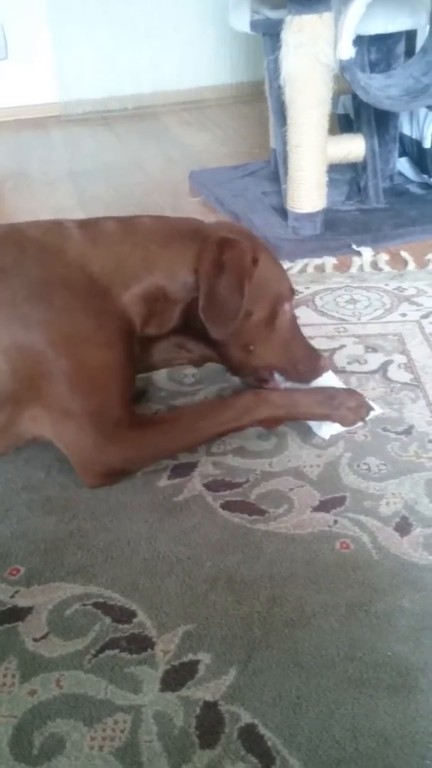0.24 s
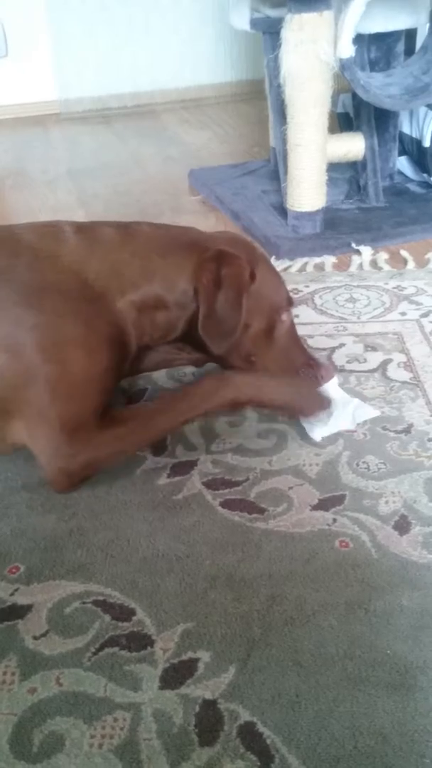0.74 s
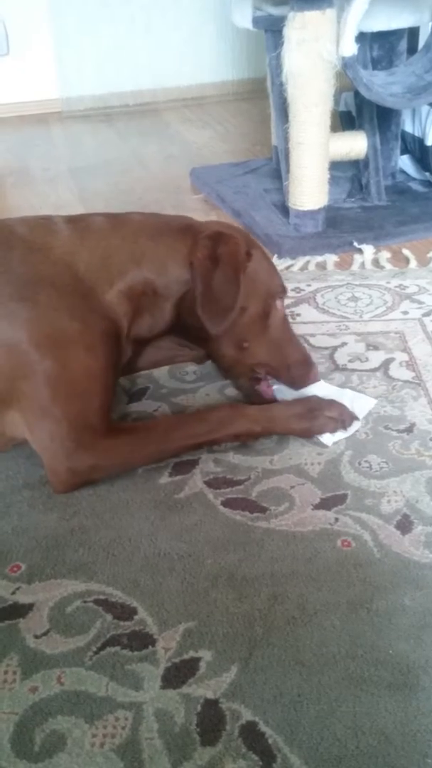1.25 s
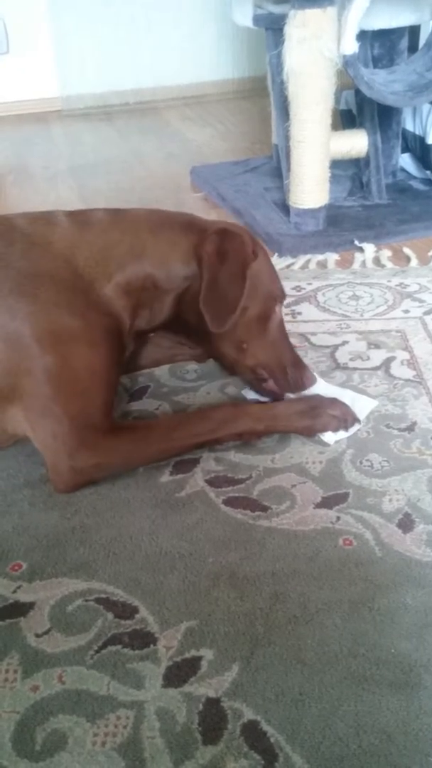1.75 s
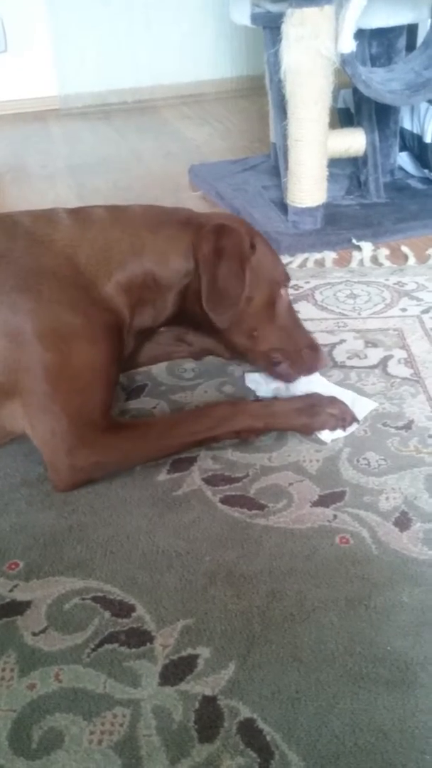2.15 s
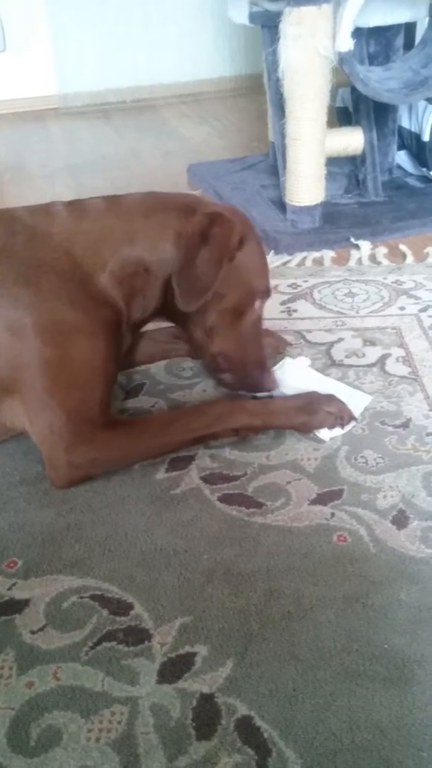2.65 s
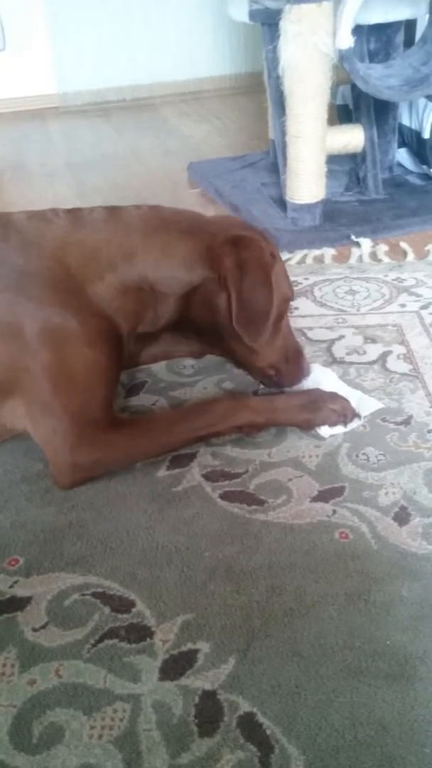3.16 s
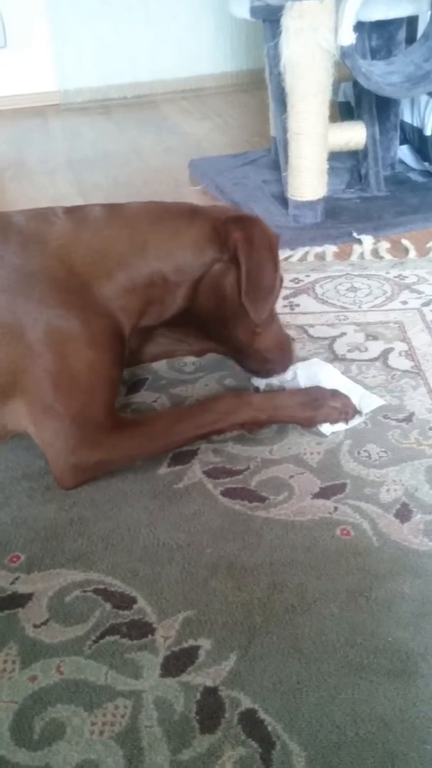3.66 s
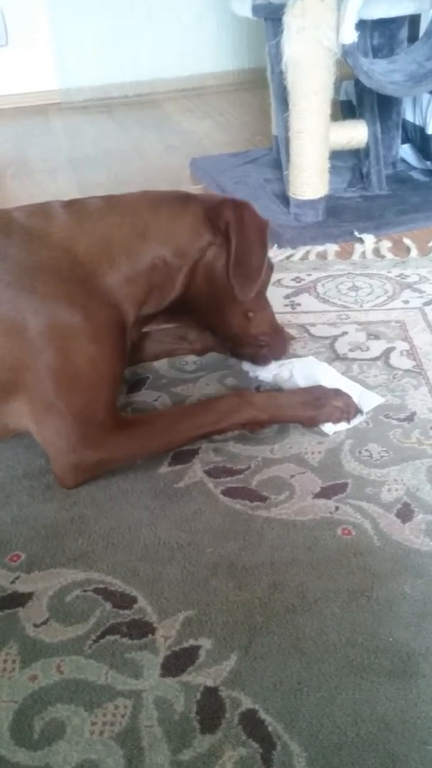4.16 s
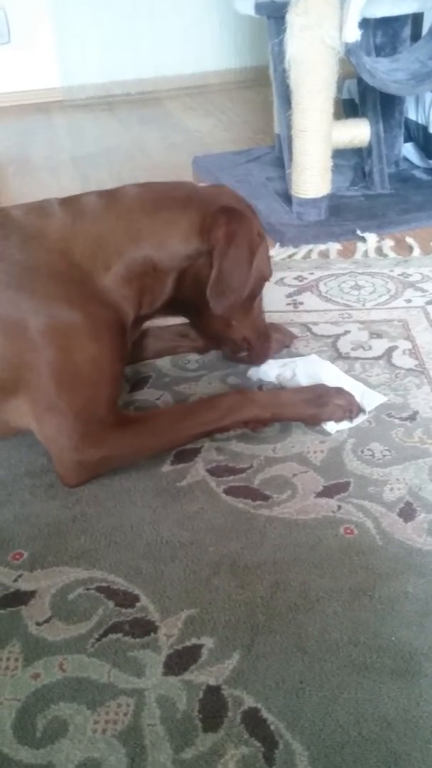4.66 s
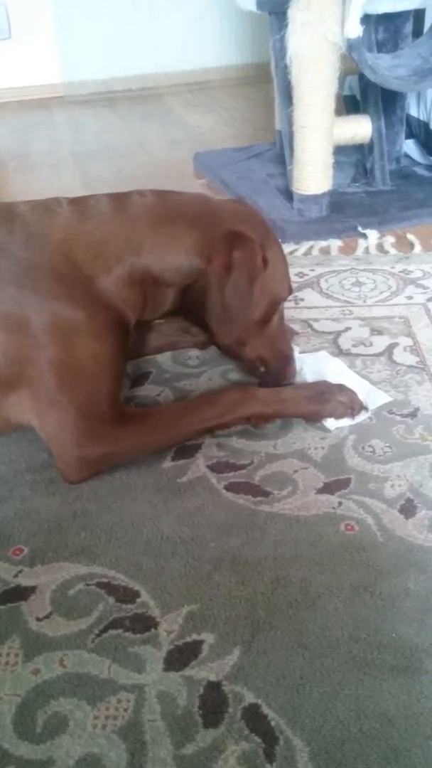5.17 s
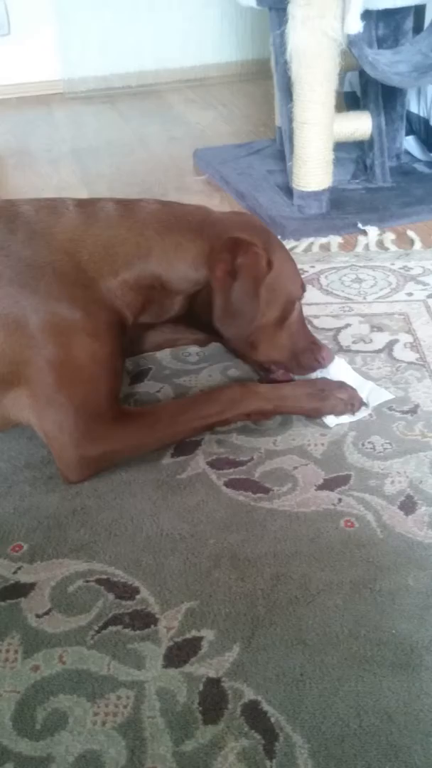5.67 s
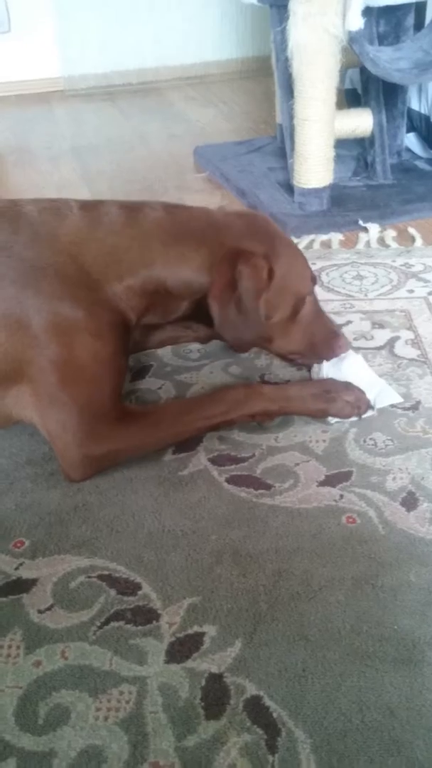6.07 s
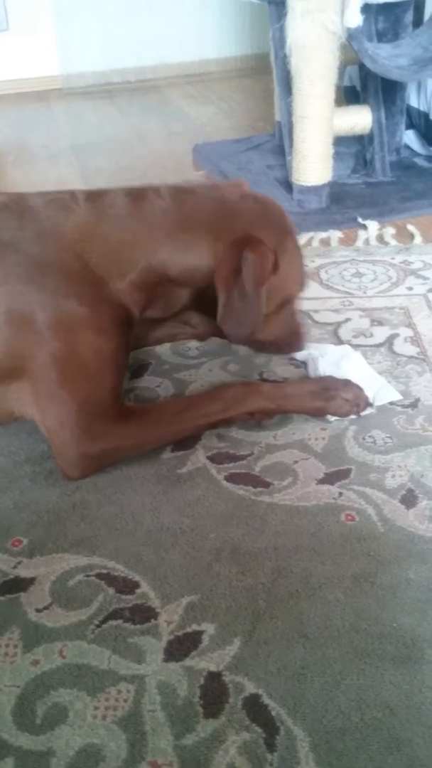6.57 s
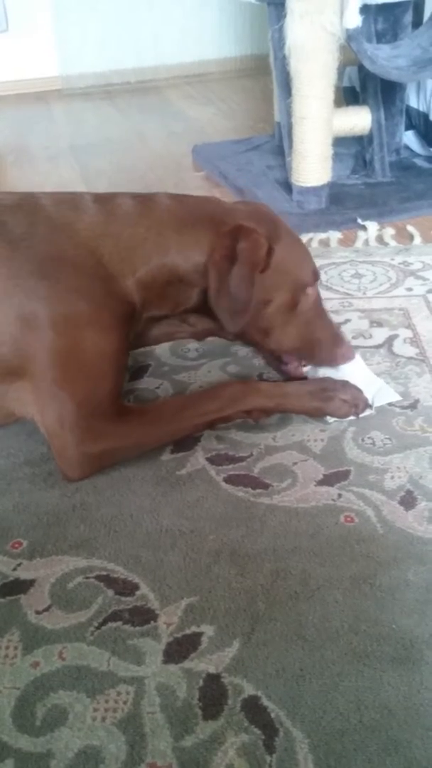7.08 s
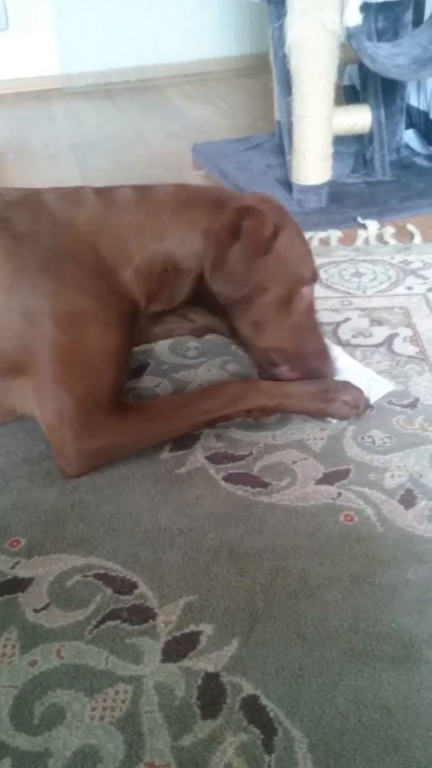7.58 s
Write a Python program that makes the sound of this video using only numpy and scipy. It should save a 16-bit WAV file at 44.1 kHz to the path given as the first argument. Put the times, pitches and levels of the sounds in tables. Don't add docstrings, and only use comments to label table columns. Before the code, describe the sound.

In a furnished room, a dog on a rug chews a paper packet roughly a metre from a small stereo microphone, over faint steady hiss and low room tone. A loud, sharp snap starts immediately, followed by dry rustles and single crackling creases, with another strong snap near 0.6 s. Irregular pawing and tearing continues to about 1.9 s. Crisp snaps at 2.0 s lead to the fullest ripping rustle around 2.6 s, then brittle crackles near 3.1 s. From 3.5 to 4.5 s small wet tongue ticks mix with lighter crinkles. Around 4.5 to 5.3 s it is sparse and quiet. A clear crease at 5.4 s restarts nibbling, with dull tooth and paw knocks. From 6 to 7.5 s a very faint, rough low groan lies underneath, with hollow gulps near 6.4, 7.0 and 7.2 s. Denser sharp crackles at 7.2-7.5 s lead to final crinkles before 7.8 s.

```python
import sys
import numpy as np
from scipy import signal
from scipy.fft import rfft, irfft, next_fast_len
from scipy.io import wavfile
from scipy.ndimage import uniform_filter1d

SR = 44100
rng = np.random.default_rng(int(sys.argv[2]) if len(sys.argv) > 2 else 0)


def master_out(mix):
    frames = np.transpose(np.atleast_2d(mix))
    ceiling = np.clip(frames, -1, 1)
    pcm = np.round(ceiling * 32767).astype(np.int16)
    wavfile.write(sys.argv[1], SR, pcm)


def invert_db(level):
    return 10 ** (np.asarray(level, dtype=float) / 20)


N = 345744
SIZE = next_fast_len(N + SR // 2)
HZ = np.arange(SIZE // 2 + 1) * SR / SIZE
PAPER_HZ = 500 * 2 ** np.arange(0, 5.1, .5)


def on_log(table, hz):
    f, v = np.transpose(table)
    return np.interp(np.log(hz + 1), np.log(f + 1), v)


def on_time(table):
    s, *columns = np.transpose(table)
    return np.array([np.interp(np.arange(N) / SR, s, c) for c in columns])


def causal(gain_db):
    c = irfft(gain_db * np.log(10) / 20, SIZE)
    c[1:SIZE // 2] *= 2
    c[SIZE // 2 + 1:] = 0
    return np.exp(rfft(c))


def bands(rows):
    pick = np.eye(len(PAPER_HZ))
    total = 0
    for k, row in enumerate(rows):
        gain = on_log(np.c_[PAPER_HZ, pick[k]], HZ) ** .5
        total = total + gain * rfft(row, SIZE)
    return total


def spread(low_db, mid_db, high_db):
    place = np.interp(np.log(PAPER_HZ), np.log([1900, 3200, 5600, 8500]), [0, 1, 1, 2])[:, None]
    low_part = np.clip(1 - place, 0, 1) * (low_db + 12.0 - mid_db)
    high_part = np.clip(place - 1, 0, 1) * (high_db + 3.5 - mid_db)
    return mid_db + low_part + high_part


def puff(clicks, decay_s):
    fall = np.exp(-1 / (decay_s * SR))
    return signal.lfilter([1], [1, -fall], clicks) * rng.standard_normal(clicks.shape)


def pair(left, own, near=0):
    alike = on_log([(50, 0.37), (130, 0.68), (700, 0.3), (2500, 0.048), (5000, 0.23)], HZ)
    alike = np.clip(alike, 0, .99)
    share = alike + np.clip(near, 0, 1) * (1 - alike)
    return np.array([left, share * left + (1 - share ** 2) ** .5 * own])


# f/Hz, level/dB
HISS_LEFT = [(40, -49.5), (130, -52.5), (250, -57), (400, -57), (750, -62.5), (1100, -67), (2000, -58),
             (3500, -59), (5100, -55), (7000, -60), (11000, -65), (15400, -100)]
HISS_RIGHT = [(40, -55), (130, -50), (250, -54), (400, -60), (750, -61), (1100, -64), (2000, -55),
              (3500, -52.5), (5100, -60), (7000, -58.5), (11000, -64), (15400, -80)]


def room_tone():
    tone = pair(*(rfft(rng.standard_normal(N), SIZE) for _ in range(2)))
    colour = invert_db([on_log(HISS_LEFT, HZ), on_log(HISS_RIGHT, HZ)]) * np.array([[1], [-1]])
    return tone * colour * invert_db(-1.0) * np.minimum(HZ / 50, 1) ** 3


# peak t/s, level/dB, build-up/(dB/s), brightness/dB
PULLS = [(0.22, -41, 78, 2), (0.559, -32, 106, 6.5), (1.104, -43.5, 43, 3), (1.246, -46, 81, 7),
         (1.469, -60, 65, 16), (1.872, -46, 60, 6), (2.396, -43, 111, -4), (2.46, -47.5, 60, 2),
         (2.57, -39, 218, 12), (2.612, -29, 217, 7.5), (2.69, -43, 100, 2), (3.12, -37, 199, -2.5),
         (3.594, -53, 89, 11.5), (3.72, -60.5, 62, 4.5), (4.03, -54, 84, -10.5), (4.102, -46.5, 117, 14.5),
         (4.21, -45, 62, -8), (4.457, -66.5, 41, 12), (4.73, -57, 320, 5), (5.538, -45, 245, 3),
         (5.778, -58.5, 50, -4), (5.895, -46, 156, 1.5), (6.072, -43, 109, 3.5), (6.25, -59, 40, 3),
         (6.76, -61, -1, 3), (7.33, -45, 115, 5), (7.42, -41.5, 79, 4)]
# peak t/s, level/dB, brightness/dB
QUICK_BITES = [(0.0, -24, 8.5), (0.412, -51, -7), (0.756, -42, 4.5), (0.877, -39, 5), (1.565, -61, 17.5),
               (1.604, -62, 9), (1.628, -41, 2), (1.992, -44.5, -2), (2.052, -36, 10), (2.242, -43, 4),
               (2.927, -45.5, 1), (3.235, -50, 6), (3.374, -51.5, 0.5), (3.963, -43, -13), (4.775, -79, -2),
               (4.886, -53, 0), (4.956, -50, 2), (4.98, -45.5, 3.5), (5.015, -52, 4), (5.161, -44, 2.5),
               (5.337, -54, 3), (5.39, -68, 17), (6.336, -44, -3), (6.435, -49, 4), (6.6, -55, 11.5),
               (6.973, -49.5, 8), (7.009, -59, 16), (7.185, -53, 8), (7.222, -41.5, 1), (7.511, -55, 12),
               (7.662, -45.5, 0), (7.755, -40, 0.5)]
# t/s, low-band level re middle/dB
SHEET_SLACK = [(0, -16.5), (1.5, -9), (2.3, -10.5), (2.51, -11), (2.63, -14.5), (3.1, -12.5), (3.9, -14),
               (4.2, -18.5), (5.4, -22.5), (6.2, -14), (7.84, -12.5)]


def chewing_levels():
    pull_fall_db_s, bite_rise_db_s, bite_fall_db_s, hold_s = 146, 450, 210, 0.0012
    low_pace, high_pace = 0.69, 1.09
    high_db, rest_db = -6, (-82, -82, -73)
    t = np.arange(0, N + 64, 64) / SR
    rows = [(s, db, rise, pull_fall_db_s, hi) for s, db, rise, hi in PULLS]
    rows += [(s, db, bite_rise_db_s, bite_fall_db_s, hi) for s, db, hi in QUICK_BITES]
    s, db, rise, fall, bright = np.transpose(rows)[:, :, None]
    under = np.maximum(rise * (s - t), fall * np.maximum(t - s - hold_s, 0))
    low = db + np.interp(s, *np.transpose(SHEET_SLACK)) - low_pace * under
    high = db + high_db + bright - high_pace * under
    levels = zip((low, db - under, high), rest_db)
    power = [(invert_db(v) ** 2).sum(axis=0) + invert_db(rest) ** 2 for v, rest in levels]
    return on_time(np.c_[t, 10 * np.log10(power).T])


def rustle(per_s=1200, colour_db=3.5):
    count = int(per_s * N / SR)
    chance = rng.random((count, 2))
    colour = rng.standard_normal((count, len(PAPER_HZ)))
    size = invert_db(-3.2 * np.log(chance[:, 1]))[:, None] * invert_db(colour_db * colour)
    clicks = np.zeros((len(PAPER_HZ), N))
    clicks[:, (chance[:, 0] * N).astype(int)] = size.T
    buckles = puff(clicks, 0.00045)
    buckles /= np.sqrt(uniform_filter1d(buckles ** 2, 2000, axis=1) + 1e-9)
    levels = chewing_levels()
    uneven = np.interp(levels[1], [-44, -33], [1, .35])
    patchy = invert_db(-7 + 90 * uneven * uniform_filter1d(rng.standard_normal(N), 900))
    swell = uniform_filter1d(rng.standard_normal(clicks.shape), 1800, axis=1)
    patchy = patchy * invert_db(110 * uneven * swell)
    level = invert_db(spread(*levels))
    washes = [bands(patchy * level * rng.standard_normal(N)) for _ in range(2)]
    return invert_db(-7.0) * level * buckles, washes


# t/s, peak level/dB, dullness/dB, brightness/dB
CREASES = [(0.0103, -20, -3.5, 0.5), (0.185, -35, -0.5, -3.5), (0.21, -50, 10, -14),
           (0.268, -45, 4, 6), (0.3111, -35, -8, -7.5), (0.376, -47, 0, -2), (0.382, -40, -2, -15),
           (0.4089, -34, -4, -1), (0.429, -37.5, 5, -13), (0.4606, -50, -2, -4), (0.469, -54, -2, 19),
           (0.4765, -32.5, -4, 1), (0.5369, -44.5, 11, 22.5), (0.5631, -30.5, 0.5, -14),
           (0.5824, -21, -4.5, -8), (0.6978, -41.5, -4, -1), (0.7419, -33.5, -14, -18),
           (0.87, -36, 4, 0), (0.8744, -32, 3, -1), (0.883, -31, -4, 1), (0.8878, -47, 10, 4),
           (0.9597, -31, -4, -4.5), (1.0007, -39, 8, 4), (1.029, -45, 5, -3), (1.0713, -49, 5, 9),
           (1.092, -47, 7, 6), (1.115, -34.5, -2, -23), (1.162, -43, 8, -8), (1.1694, -41, 9, -12),
           (1.176, -49, 18.5, 11), (1.237, -41.5, 5, 1), (1.248, -41, 5, 0), (1.283, -42.5, 6, 6),
           (1.299, -55, 6, 11), (1.4558, -60.5, 17, 13), (1.5609, -48, 2, -7), (1.5997, -45, 12, 10),
           (1.6178, -46, 16, 9), (1.6263, -47, 9, -12), (1.64, -33.5, -6, -13), (1.6735, -55, -3, 11),
           (1.712, -43, -7, -10), (1.7316, -45, 1, 0), (1.7406, -44, 8, 10.5), (1.7627, -48, -10, 9),
           (1.7726, -44, -8, 6), (1.7888, -37, -6, -2), (1.793, -42, -5, 2), (1.822, -39.5, -1, 3),
           (1.864, -32.5, 2, -2.5),
           (1.908, -37.5, -5, 2), (1.914, -44, -15, 10), (1.9845, -35.5, -8, 10),
                (2.003, -39.5, -3, 12), (2.011, -32.5, -6, -8), (2.0318, -45, 12, 5), (2.0414, -35, -5, 14),
                (2.0457, -22.5, -2.5, -11), (2.0962, -45, 14, 11), (2.3098, -36, -6, -12),
                (2.314, -56, 8, 9), (2.3346, -38, -5, -0.5), (2.3596, -33.5, -7, -2),
                (2.3929, -43.5, 1, 17.5), (2.4025, -58, 3, 19), (2.4395, -33, -3, -15),
                (2.5283, -32.5, -16, -1.5), (2.548, -40, -7, 0), (2.599, -29, -1, -2),
                (2.886, -47.5, 7, -11), (2.917, -35.5, -17, -8), (3.018, -45, -5, -5), (3.04, -50, 12, 8),
                (3.048, -43, -12, 4), (3.0568, -33.5, -1, -7), (3.0856, -41, 10, 5), (3.092, -33.5, 0, 0),
                (3.1136, -27.5, 1, -1), (3.1983, -44, 5, 2), (3.2159, -30, -5.5, -0.5),
                (3.2257, -40.5, 5.5, -12), (3.3314, -41, 1.5, 4), (3.5478, -40.5, -19, -19),
                (3.8783, -48.5, 12.5, 0), (4.0269, -46, 3, -12), (4.0447, -36.5, 1, -16),
                (4.0543, -39, -1, 0), (4.0964, -38, 14, 2), (4.1302, -48.5, 6, 17), (4.133, -52, -4, 11),
                (4.1553, -41, -9, 9), (4.168, -36.5, -5, -3), (4.186, -43.5, 8, 8), (4.199, -40.5, 6, 15.5),
                (4.2135, -38, -1, 9.5), (4.6483, -55.5, 0, 4), (4.7273, -47, -9.5, -12),
                (4.9498, -41, -14, -12), (5.1561, -47.5, 16, 8), (5.3386, -59, 8, -5),
           (5.344, -49, -11, -15), (5.361, -28.5, -9, -9.5), (5.3712, -49, -13, -6),
                   (5.5094, -47, 2, -5), (5.5157, -37, 2, -21), (5.5322, -44, 3, 2), (5.541, -39, -8, -3),
                   (5.5475, -44, 1, -2), (5.567, -37.5, 2, 0.5), (5.776, -50, -7, 8),
                   (5.896, -43.5, -8, -3), (5.9678, -43, -2, -25), (5.9843, -59, 4, 11),
                   (6.023, -47.5, 11, -10), (6.096, -40, 3, -7), (6.1014, -51, 1, -11),
                   (6.162, -47, -11, -21), (6.1738, -49, -23, 1), (6.185, -44.5, 2.5, -11),
                   (6.3261, -39, 2, -5), (6.3359, -33.5, -1.5, -2.5), (6.4248, -40.5, -6, -9),
                   (6.4428, -39, -9, -16), (6.5905, -42.5, 8, -6), (6.8185, -46, -2.5, -6),
                   (6.8956, -54.5, 11, 1), (6.9629, -47, -1, -3), (6.967, -37.5, -4, -11),
                   (7.004, -28.5, -18, -13), (7.1788, -38.5, -1, -1), (7.219, -24.5, -12, -7),
                   (7.285, -52, -7, -7), (7.3, -37.5, 5, -21), (7.309, -35, -19, -5), (7.3172, -32, -12, 5),
                   (7.329, -33, -7, -6), (7.352, -35.5, -1, -4), (7.4083, -31.5, 2, -4),
                   (7.422, -29.5, -6, 4), (7.4317, -52, -5, 5), (7.4484, -52, -5, 1),
                   (7.494, -27.5, -15, -12), (7.5024, -43, -12, -15), (7.6456, -39, 3, -6),
                   (7.6791, -47, 16.5, -2), (7.6897, -37.5, -3, -8), (7.7025, -41, -4, 0),
                   (7.712, -40, -13, -7), (7.7438, -39, 4, -6), (7.8137, -41, -13, -3),
           (1.809, -40, 4, 0), (1.989, -41, 10.5, 4), (2.049, -30, -4, -1), (2.4612, -48, 0, 7),
               (2.614, -45, 5, 18), (2.9222, -54, -14, -2), (2.9298, -48, -8, -14), (2.9392, -51, -7, 2),
               (2.9415, -49, -9, -10), (2.9553, -41, -8, -4), (3.1035, -43, -4, 8), (3.1175, -49, 2, -8),
               (3.132, -46, -8, 4), (3.2686, -50, -5, 10.5), (3.9875, -58, 2, 11), (4.4508, -65, 0, 10),
               (4.7365, -70, 16, 0), (4.745, -66, 17, -7), (4.752, -62.5, 17, -5), (4.775, -63, 13, -5),
               (4.879, -56, 14.5, -8), (4.884, -52, 9, -6), (4.9, -65, 3, -8), (5.353, -50, -14, -10),
               (6.976, -41, -2, -13), (7.0019, -43.5, 5, -14), (7.0072, -40.5, 15.5, -14),
               (7.012, -51, 4, -8), (7.0176, -58, 6, -6), (7.191, -42, -5, 0), (7.235, -41, -18, -10),
               (7.242, -48, -10, -12), (7.728, -52, -4, 8), (2.5625, -33, -8, 0), (0.75, -36, -8, -11),
               (1.101, -40, -2, -1), (2.621, -43, 0, 0), (2.641, -35, 0, 0), (2.97, -48, -8, -8),
               (3.069, -45, -4, -4), (7.522, -41, -8, -11)]


def crease_snaps(colour_db=1.0, rise_s=.00075):
    s, mid_db, dull, bright = np.transpose(CREASES)
    colour = rng.standard_normal((len(PAPER_HZ), len(s)))
    hollow = np.interp(np.log(PAPER_HZ), np.log([1400, 2800, 4000, 5600]), [.4, 1, .7, 0])[:, None] * dull
    db = spread(mid_db - 19.5, mid_db, mid_db + bright) + hollow + colour_db * colour
    clicks = np.zeros((len(PAPER_HZ), N))
    clicks[:, (s * SR).astype(int)] = invert_db(db + 0.5)
    fall = np.exp(-1 / (rise_s * SR))
    swell = signal.lfilter([np.e * (1 - fall)], [1, -fall], clicks)
    early = np.roll(swell, -int(1.6 * rise_s * SR), axis=1)
    return invert_db(-3.0) * clicks + invert_db(2.5) * puff(early, rise_s)


# f/Hz, T60/s
DECAY_T60 = [(500, 0.72), (1500, 0.34), (4000, 0.3), (12000, 0.26)]


def room(wet_db, gap_s=0.0029):
    t = np.arange(SR // 2) / SR
    onset = np.clip(t / gap_s - .5, 0, 1)
    fade = invert_db(-60 * t / on_log(DECAY_T60, PAPER_HZ)[:, None]) * onset
    tails = [bands(fade * rng.standard_normal(len(t))) for _ in range(2)]
    return 1 + invert_db(wet_db) * pair(*tails)


# f/Hz, level/dB
PAPER_LEFT = [(300, -14.5), (500, -6), (750, -0.5), (1100, 3), (1500, 4.5), (2500, 3), (3700, 5),
              (4500, 10), (5150, 18.5), (6000, 5.5), (7500, -1.5), (10500, -4), (13500, -4), (15400, 4)]
PAPER_RIGHT = [(300, -14), (500, -8), (750, 1.5), (1200, 7), (1500, 6.5), (2300, 6.5), (3300, 11),
               (4200, 9), (5000, 1), (6500, -4.5), (9300, -3.5), (10800, 2), (12500, -5), (15400, -24)]
# f/Hz, phase/rad
PHASE_LEAD = [(0, 2), (260, 5), (520, 3), (2240, 3), (4650, 7), (5510, 13), (6550, -8.5), (7580, 11.5),
              (9560, 10), (10200, 11), (14600, 18), (15200, 54), (16100, 6), (16500, -27)]


def paper_ports():
    left_db, right_db = on_log(PAPER_LEFT, HZ), on_log(PAPER_RIGHT, HZ)
    left = causal(left_db + 12 * np.log2(np.clip(HZ / 300, .01, 1)))
    lead = np.interp(HZ, *np.transpose(PHASE_LEAD))
    return np.array([left, left * invert_db(right_db - left_db) * np.exp(-1j * lead)])


# t/s, left-minus-right level/dB
HEAD_DRIFT = [(0, -1.5), (1.3, -1.5), (3.2, .5), (3.75, -2.5), (4.3, 0), (5.5, -0.5), (6.7, 1), (7.84, 1)]


def head_turn():
    return invert_db(on_time(HEAD_DRIFT) * np.array([[.5], [-.5]]))


def hollow_rings(table, t60_s):
    out, t = np.zeros(N + SR), np.arange(SR // 8) / SR
    modes = [(1, 1), (1.09, .45), (.92, .45)]
    for s, db, hz in table:
        ring = sum(share * np.sin(2 * np.pi * ratio * hz * t) for ratio, share in modes)
        start = int(s * SR)
        out[start:start + len(t)] += invert_db(db + 4.0 - 60 * t / t60_s) * ring * np.minimum(t / 0.002, 1)
    return out[:N]


# t/s, peak level/dB, ring f/Hz
QUICK_TICKS = [(2.5466, -58, 2240), (2.5964, -52, 2230), (3.5314, -48, 2300), (3.696, -49, 2100),
               (3.7873, -40.5, 2070), (3.8394, -48, 1960), (3.905, -41.5, 2000), (4.3555, -52, 1950),
               (4.368, -53, 1950), (4.381, -49, 930), (4.39, -54, 1000), (4.397, -49.5, 894),
               (4.451, -57, 1980), (4.484, -50, 2030), (4.496, -51, 1950), (4.4687, -51, 1870),
               (4.5042, -54, 1990), (4.435, -56, 1950), (4.542, -52, 1990), (6.24, -40, 2220),
               (6.67, -42, 2580), (7.3512, -34.5, 2060)]


def licks():
    return hollow_rings(QUICK_TICKS, t60_s=.012)


# t/s, peak level/dB, ring f/Hz
DULL_KNOCKS = [(3.33, -55, 1260), (3.502, -57, 1190), (3.786, -60, 770), (5.677, -64.5, 885),
               (5.697, -55.5, 860), (5.716, -62, 920), (5.735, -58, 875), (6.189, -58, 804),
               (6.329, -49, 1230), (6.998, -47.5, 1240), (7.043, -63, 815), (7.214, -54, 1220),
               (7.408, -68, 1290), (7.649, -57, 1280), (7.761, -44.5, 868)]


def knocks():
    return hollow_rings(DULL_KNOCKS, t60_s=.045)


# t/s, level/dB
GROAN_LEVEL = [(5.97, -92), (6.02, -81), (6.14, -88), (6.2, -75), (6.61, -75), (6.635, -86), (6.66, -74),
               (7.39, -75), (7.52, -92)]
# f/Hz, width/Hz, level/dB
THROAT_MODES = [(124, 30, -20), (210, 100, -1), (400, 250, -7), (770, 280, 5)]


def groan(rate_hz=94.0, jitter=.055, throb_hz=26.5, breath=0.18):
    begin, end = GROAN_LEVEL[0][0], GROAN_LEVEL[-1][0]
    chance = rng.standard_normal((1200, 2))
    tense = np.interp(np.arange(len(chance)), [0, 72, 80, 115, 150], [1.25, 1.2, 1.03, .97, 1.1])
    s = begin + np.cumsum((1 + jitter * chance[:, 0]) / tense) / rate_hz
    inside = s < N / SR - .01
    s, size = s[inside], invert_db(2 * chance[inside, 1])
    throb = 1 + 0.88 * np.sin(2 * np.pi * throb_hz * s)
    drive = breath * rng.standard_normal(N)
    drive[(s * SR).astype(int)] += size * throb * (SR / rate_hz) ** .5
    t = np.arange(N) / SR
    drive *= invert_db(on_time(GROAN_LEVEL)[0]) * (t > begin) * (t < end)
    shape = sum(invert_db(db) * (SR / w) ** .5 / (1 + 2j * (HZ - f) / w) for f, w, db in THROAT_MODES)
    return shape * rfft(drive, SIZE) * np.minimum(HZ / 150, 1) ** 4 / (1 + (HZ / 1050) ** 4)


# t/s, peak level/dB, ring f/Hz
MOUTH_RINGS = [(6.428, -52.5, 827), (6.47, -61, 817), (6.998, -43, 851), (7.04, -55, 877), (7.22, -49, 885),
               (7.27, -59, 860), (7.31, -56, 783), (7.355, -61, 846)]


def gulps():
    return hollow_rings(MOUTH_RINGS, t60_s=.1)


def dull_ports(lag_s):
    return np.array([HZ ** 0, -invert_db(4.5) * np.exp(-2j * np.pi * HZ * lag_s)])


def scene():
    space = room(-35.0)
    buckles, washes = rustle()
    wash = pair(*washes, near=0.53 / (1 + (HZ / 1800) ** 4))
    paper = (bands(buckles + crease_snaps()) * space + wash) * paper_ports()
    mouth = rfft(licks() + knocks() + gulps(), SIZE) * dull_ports(lag_s=0.00013)
    chest = groan() * dull_ports(lag_s=-0.00018)
    dull = (1 + space) / 2 * (mouth + chest)
    return head_turn() * irfft(paper, SIZE)[:, :N] + irfft(dull + room_tone(), SIZE)[:, :N]


def low_pass(x):
    return signal.sosfilt(signal.butter(12, 17000, fs=SR, output="sos"), x)


def record(dry):
    top = signal.ellip(8, .3, 40, 15750, fs=SR, output="sos")
    mix = signal.sosfilt(top, dry) - .00026
    return low_pass(mix)


dry = scene()
out = record(dry)
master_out(out)
```